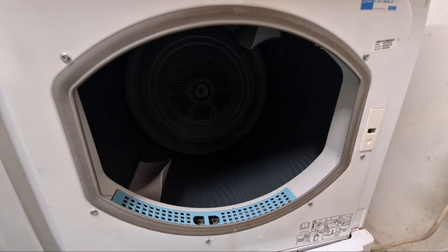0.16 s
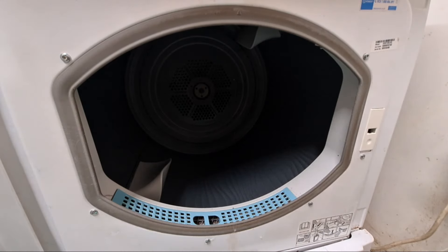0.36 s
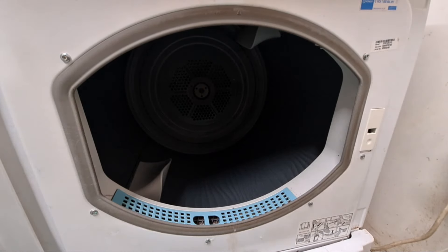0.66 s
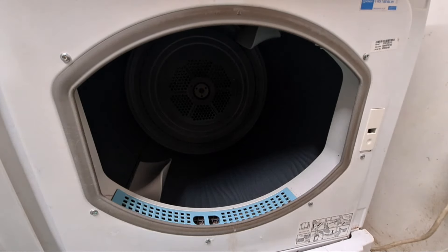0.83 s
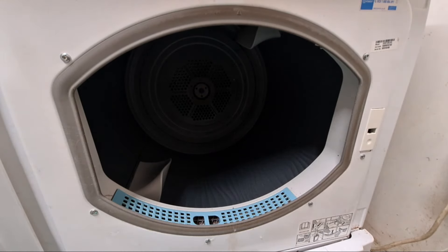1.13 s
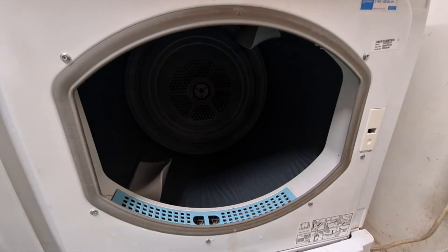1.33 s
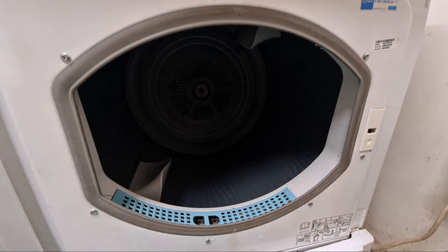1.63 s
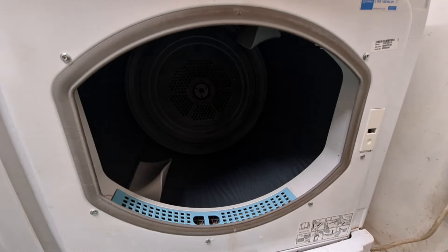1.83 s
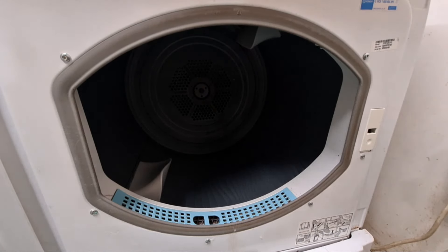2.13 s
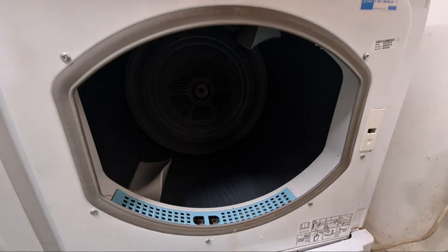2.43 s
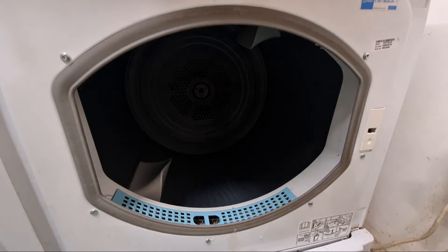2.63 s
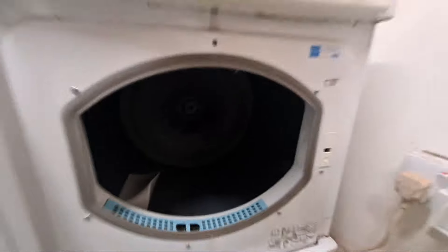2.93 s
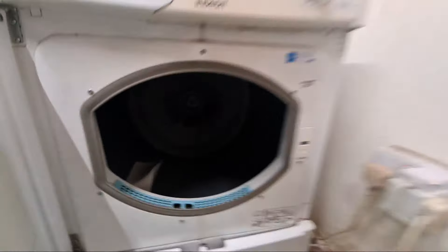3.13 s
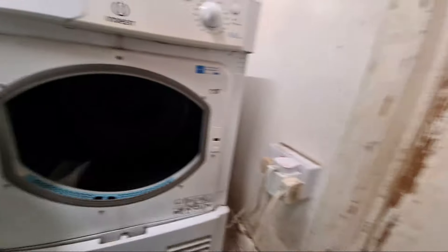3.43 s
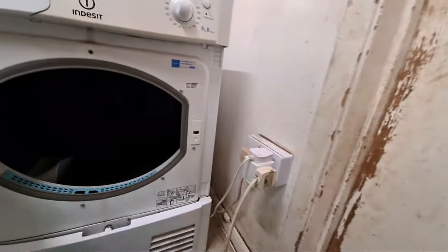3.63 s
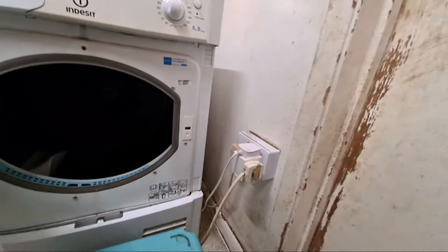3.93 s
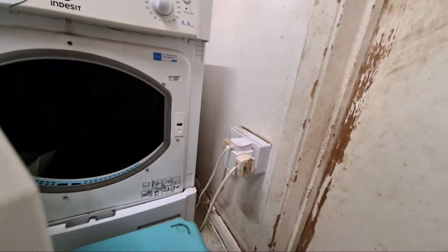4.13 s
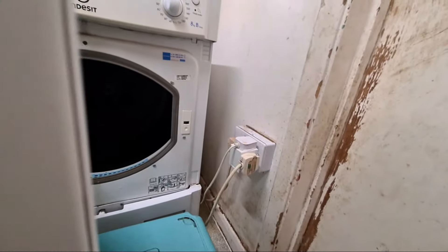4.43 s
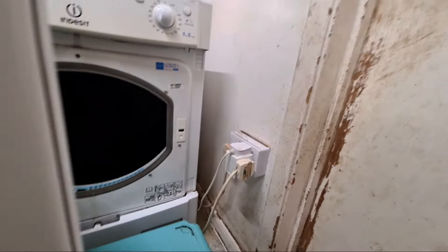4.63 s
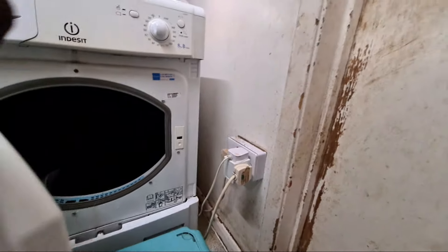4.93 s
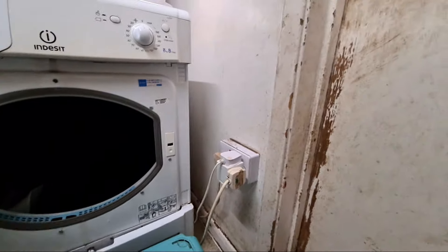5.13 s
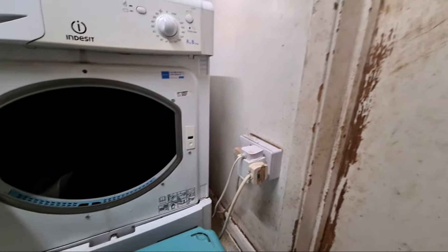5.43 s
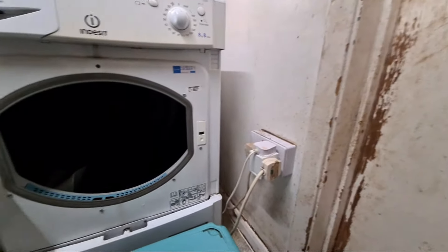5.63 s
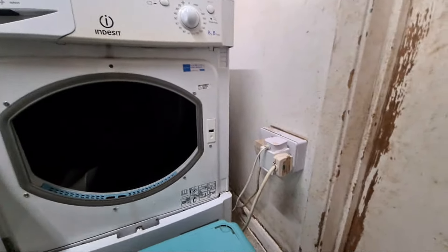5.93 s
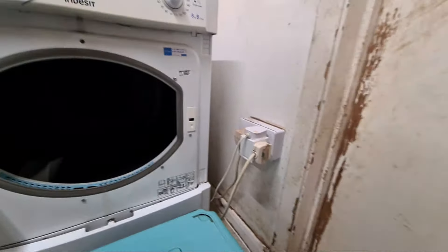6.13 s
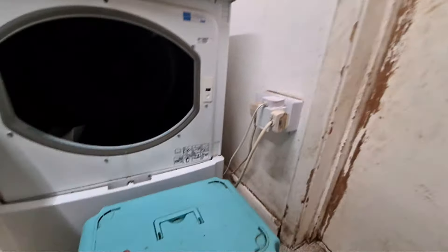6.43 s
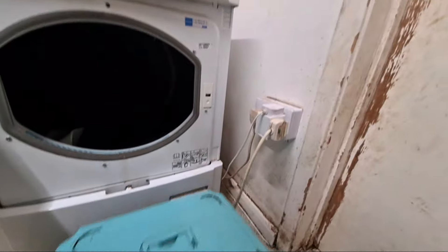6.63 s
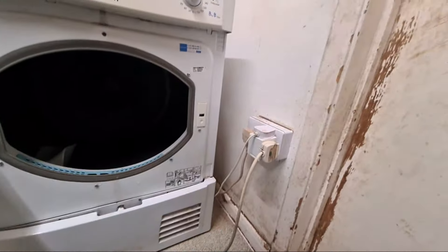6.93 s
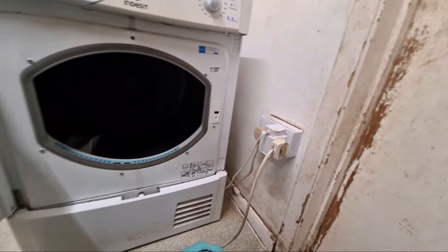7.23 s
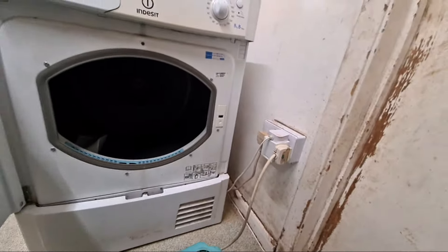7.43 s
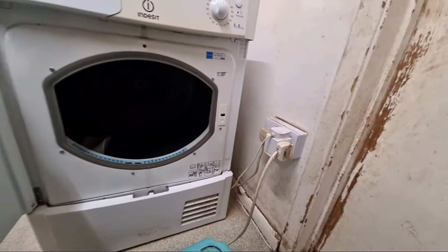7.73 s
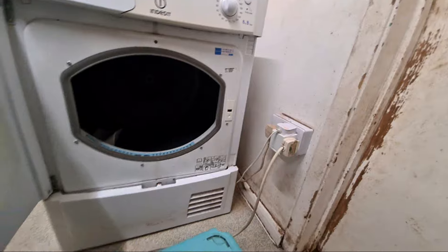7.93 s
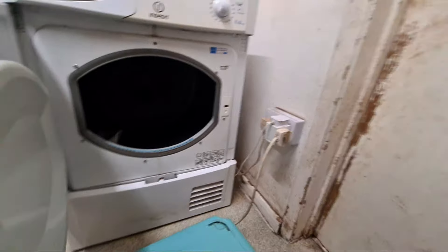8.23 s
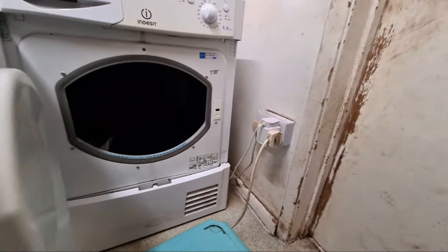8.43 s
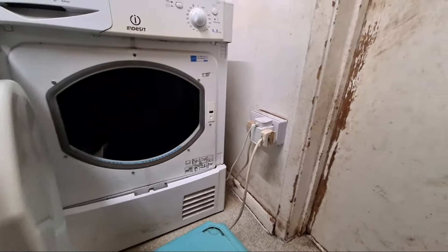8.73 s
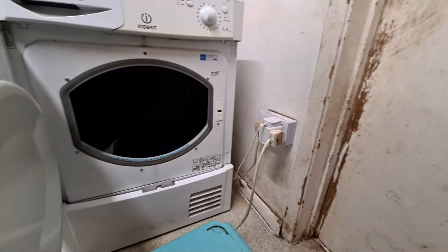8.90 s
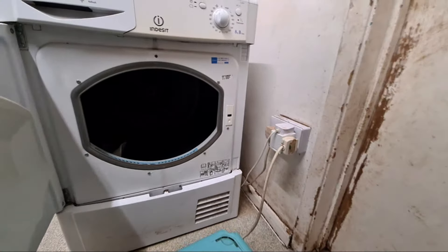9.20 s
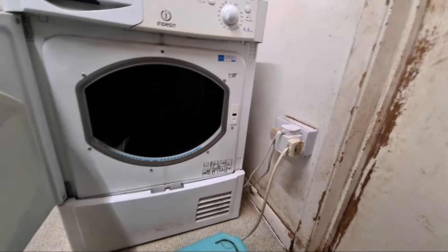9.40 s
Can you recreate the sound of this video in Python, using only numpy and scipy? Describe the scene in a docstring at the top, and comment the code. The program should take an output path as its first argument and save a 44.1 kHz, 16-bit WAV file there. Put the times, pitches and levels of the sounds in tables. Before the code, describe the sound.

Heavy hollow thumps and juddering plastic drags against a sheet-metal dryer cabinet, with small squeaks and clicks over a faint low hum.

```python
"""In a small, quiet room, a hollow plastic water container is handled at a tumble dryer.
Blows on the sheet-metal cabinet mix panel thumps, ringing body modes and wall clacks.
Two long, juddering drags along the runners and many short rubs are random jerks driving the same body.
Stick-slip squeaks, light clicks and fine hiss join in, over a low sine hum and faint steady noise."""
import sys
import numpy as np
from scipy import signal
from scipy.fft import rfft, irfft, next_fast_len
from scipy.io import wavfile
from scipy.ndimage import uniform_filter1d

SR = 44100
rng = np.random.default_rng(int(sys.argv[2]) if len(sys.argv) > 2 else 0)


def transcribe(u):
    """Save the signal u as a 16-bit wav file named by the first command-line argument.

    u: samples, shape (n,) or (channels, n), limited to [-1, 1]; the rate is SR.
    q: integer samples, one column per channel.
    """
    v = np.clip(np.atleast_2d(u).T, -1, 1)
    q = np.round(v * 32767).astype(np.int16)
    wavfile.write(sys.argv[1], SR, q)


N = 421596

# blows of the container: start_s, thump_hz, clack_hz, thump_db, hollow_body_db, wall_clack_db
KNOCKS = [(0.205, 105, 430, -42.5, -73, -80), (0.482, 132.4, 510, -21.5, -34, -43.5),
          (0.665, 133, 347, -39, -60, -74), (1.767, 146, 790, -21, -42, -47),
          (1.995, 123, 980, -23.5, -41.5, -56), (2.338, 123, 472, -43, -43, -68),
          (2.756, 96, 2034, -44, -42, -32.5), (2.84, 96, 287, -44, -41.5, -54),
          (3.256, 111, 517, -50, -36.5, -52.5), (3.301, 147, 1058, -19.5, -17.5, -28),
          (3.318, 90.5, 530, -14, -35, -39), (3.344, 85, 1010, -21, -35, -31.5),
          (3.438, 153, 1106, -23, -27, -34.5), (3.549, 126, 456, -16, -34, -45),
          (4.084, 152, 444, -24.5, -41, -42), (4.438, 194, 470, -45.5, -48, -54.5),
          (5.132, 177, 307, -10, -21, -32.5), (5.155, 147, 652, -21, -23.5, -33),
          (5.183, 102, 550, -18, -35, -36), (5.194, 100, 446, -16.5, -40, -61),
          (5.245, 117.6, 382, -21, -38, -74), (6.474, 109, 460, -41, -42, -39.5),
          (6.515, 164, 404, -27, -28, -31), (6.533, 182, 1820, -31, -48, -27.5),
          (6.561, 167, 270, -11, -18.5, -36), (6.622, 169, 1341, -19.5, -31, -45),
          (6.667, 100, 1408, -28, -43, -34), (6.744, 173.5, 1370, -17.5, -37, -44),
          (6.896, 159.5, 1314, -12.5, -32, -32.5), (6.992, 163, 1240, -21.5, -31, -47),
          (7.392, 159, 438, -30.5, -39.5, -62), (7.711, 112, 276, -33.5, -57, -48.5),
          (7.845, 120, 486, -30.5, -51, -71), (8.063, 121, 367, -39, -18.5, -33),
          (8.077, 122, 994, -20, -23.5, -30.5), (8.222, 122, 562, -42.5, -38.5, -52),
          (8.481, 126, 930, -39, -40.5, -48.5), (8.566, 177, 2052, -25, -27.5, -35.5),
          (8.669, 103, 286, -21, -38.5, -51.5), (8.753, 115, 686, -53, -39.5, -58),
          (8.858, 146, 556, -56, -40, -65), (8.919, 172, 780, -28.5, -33.5, -50),
          (9.392, 213, 1710, -27.5, -37, -36.5), (9.473, 145, 632, -19, -29.5, -49),
          (9.511, 152, 774, -17.5, -28.5, -50)]
# cabinet and container ringing together: pitch_hz, level_db, t60_s
BODY_MODES = [(80.6, -9.5, 0.98), (103.2, -9, 0.93), (144.6, 2.5, 0.41), (167.8, -4, 0.42),
              (205.1, -14, 0.24), (211.3, -5.5, 0.65), (285.2, -4.5, .25), (312.4, -7.5, .4),
              (341, -7.5, 0.42), (399.7, -0.5, 0.15), (438.6, -1.5, 0.31), (511, -2, 0.19),
              (642.7, -9, 0.23), (650, -13, 0.57), (741, -23, 0.071), (937, -16.5, 0.18),
              (1017, -11.5, 0.74), (1070, -14, 0.13), (1202, -7, 0.17), (1300, -9, 0.075), (1309, -1, 0.11),
              (1580, -20, 0.2), (1894, -13, 0.41), (2270, -21.5, 0.13), (3450, -30.5, 0.45),
              (3620, -24, 0.15), (4595, -27.5, .12)]
# colour of the crowd of higher wall modes: frequency_hz, density_db (per Hz)
WALL_COLOUR = [(45, -34.5), (70, 8), (120, 7), (170, 3.5), (250, -6), (320, -6.5), (500, -5), (800, -11),
               (1250, -6.5), (3000, -22.5), (4800, -22), (7300, -37), (9000, -28.5), (16000, -35)]
# four bands from judder over hollow body and wall rasp to hiss: low_hz, high_hz
REGISTERS_HZ = [(62, 250), (250, 800), (800, 3000), (3000, 17000)]
# effort of the pull, one curve for each long drag: time_s, pull_db
DRAGS = [
    [(3.47, -41), (3.634, -30), (3.682, -24.5), (3.688, -25.5), (3.848, -25), (3.948, -39), (4.194, -41.5),
     (4.266, -50.5), (4.34, -74)],
    [(6.52, -41), (6.532, -36.5), (6.636, -39.5), (6.78, -33), (6.828, -38), (6.888, -30.5), (7.07, -50),
     (7.104, -57), (7.18, -79)],
]
# answer of each register to the pull: level_db (at the reference pull), follow_db (per dB of pull)
DRAG_RESPONSE = [(-20, 0.9), (-24.5, 1.09), (-30, 1.0), (-44.5, 0.66)]
# how heavily the container bears down, one value for each drag: judder_db
DRAG_JUDDER_DB = [0, -5.5]
# short rubs of plastic on plastic: start_s, length_s, level_db, extra_judder_db, brightness_db
RUBS = [(0.803, 0.075, -67, 10, 11.5), (1.177, 0.1, -67.5, 5.5, 0), (1.447, 0.44, -68.5, 15, 2),
        (2.325, 0.12, -53, 2.5, -2.5), (2.609, 0.13, -51.5, -3.5, 5.5), (2.838, 0.13, -50, 3, -3),
        (2.978, 0.063, -46, 1, 1.5), (3.103, 0.086, -47.5, 1.5, -0.5), (4.508, 0.22, -66, 3.5, 8),
        (4.918, 0.065, -53, 4, 3.5), (5.338, 0.054, -52, 12.5, 9), (5.442, 0.11, -65, 16.5, -1.5),
        (5.647, 0.057, -57.5, -1.5, 3), (6.297, 0.12, -54.5, 5, 21), (6.354, 0.046, -47, -10, 12.5),
        (6.464, 0.045, -47, 9.5, 5), (7.07, 0.021, -39, -19, 6), (7.145, 0.15, -52.5, -0.5, 7),
        (7.7, 0.12, -43.5, 8, 5), (7.83, 0.093, -54.5, 11, -8), (7.958, 0.15, -45.5, -4, 1),
        (8.072, 0.079, -39.5, -8, 12), (8.215, 0.02, -58, -5, -12), (8.308, 0.29, -62.5, -12, -4),
        (8.565, 0.068, -50.5, 4, 2), (8.584, 0.089, -59.5, 22.5, -2), (8.876, 0.041, -45, 4, -5),
        (9.009, 0.041, -51.5, 1, 0.5), (9.096, 0.042, -60.5, 12, 9.5), (9.358, 0.144, -42, 0.5, 11.5)]
# squeaks and groans of even stick-slip: start_s, length_s, pitch_hz, level_db
SQUEAKS = [(0.074, .2, 1350, -71.5), (0.075, 0.22, 2030, -76), (1.451, 0.069, 920, -66),
           (1.53, 0.19, 714, -63), (2.614, 0.16, 1020, -50), (2.743, 0.032, 1250, -36),
           (3.66, 0.1, 169, -7.5), (3.72, 0.06, 212.3, -13.5), (3.728, 0.07, 313.7, -18),
           (3.809, 0.068, 1110, -29), (3.85, .11, 147.8, -16), (4.041, 0.063, 304, -32.5),
           (6.369, 0.061, 411, -38.5), (6.522, 0.015, 1920, -27), (6.865, 0.042, 910, -31),
           (6.882, 0.021, 2050, -31.5), (8.48, 0.092, 944, -49)]
# light clicks, some alone, some the sharp treble onset of a blow: start_s, level_db, tilt_db (per octave)
CLICKS = [(2.802, -51, 3), (4.970, -55.5, -8.5), (5.127, -39, -6.5), (5.271, -44, -0.5), (6.014, -65, 3),
          (6.473, -37.5, -7), (6.517, -32.5, -2.5), (6.534, -42, 2), (6.887, -36, 5), (7.252, -35.5, 1),
          (7.712, -53.5, 2), (7.749, -45, 1), (7.893, -40.5, 1.5), (8.064, -24.5, -4.5), (8.083, -37.5, -8),
          (8.568, -35, -24), (8.671, -57.5, -4), (8.829, -50, 1), (9.122, -51, 3), (9.395, -41.5, -1)]
# colour of a click before its tilt: frequency_hz, density_db (per Hz)
CLICK_COLOUR = [(1500, -4.5), (3300, -4), (5200, 1), (7300, -4.5), (9000, 1), (12000, -1.5), (16000, -9)]
# fine treble hiss during handling and along the second drag: start_s, length_s, level_db
HISSES = [(2.3, 0.79, -70), (4.613, 0.12, -70.5), (5.52, 0.17, -73.5), (6.03, .11, -68.5),
          (6.273, 0.081, -59.5), (6.52, 0.4, -55.5), (7.004, 0.41, -66.5)]
# swell of the hum: time_s, level_db
HUM_LEVEL = [(0, -47.5), (2.3, -47), (4.2, -39), (4.5, -66.5), (5.05, -48), (5.9, -51), (7.5, -49),
             (9.56, -51.5)]
# colour of the steady background noise, with a little more hiss above 8 kHz: frequency_hz, density_db (per Hz)
STEADY_COLOUR = [(20, -34), (40, -16), (55, 3), (75, 0.5), (110, 3), (170, -17), (300, -17), (420, -29.5),
                 (1000, -36.5), (3000, -45), (7300, -49.5), (8600, -41.5), (12000, -43), (16000, -51.5)]

CONTACT_S = 0.0047  # build-up of a blow, to within 60 dB of its full force
TICK_DB = -14  # edge ticks against the wall clack
REFERENCE_PULL_DB, DRAG_FADE_S = -27, 0.016
RASP_DB, HISS_DB = -16, -25.5  # a rub's upper registers against its hollow body
HISS_FOLLOWS = 0.86  # dB of hiss per dB of brightness
ATTACK_S, RELEASE_DB_PER_S = 0.031, 173.5  # shared by rubs and fine hisses
FIRM_DB, LIGHT_DB = -30, -65  # squeak levels of a firm and a light touch
WANDER_FIRM, WANDER_LIGHT = 0.035, 0.115  # rms pitch wander, fraction of the pitch
HUM_HZ, STEADY_DB = 66.5, -54
CUTOFF_HZ = 15900


def from_db(db):
    """Decibels to gain."""
    return 10 ** (np.asarray(db) / 20)


def rms_one(x):
    """Scale to unit power."""
    return x / np.sqrt(np.mean(x ** 2) + 1e-20)


def peak_one(x, size=220):
    """Scale so that the loudest few milliseconds have unit power."""
    return x / np.sqrt(uniform_filter1d(x ** 2, size).max() + 1e-20)


def in_time(rows):
    """Each column of a curve at every sample."""
    s, *columns = np.transpose(rows)
    return [np.interp(np.arange(N) / SR, s, column) for column in columns]


def band(x, edges):
    """Causal band-pass."""
    return signal.sosfilt(signal.butter(4, edges, "band", fs=SR, output="sos"), x)


def noise(colour, n):
    """Noise of a given colour and unit power."""
    hz, db = np.transpose(colour)
    size = next_fast_len(n)
    grid = np.maximum(np.fft.rfftfreq(size, 1 / SR), 1)
    shape = from_db(np.interp(np.log(grid), np.log(hz), db))
    white = rfft(rng.standard_normal(size))
    return rms_one(irfft(white * shape, size)[:n])


def dying(t, t60):
    """Exponential decay, 60 dB down after t60 seconds."""
    return np.exp(-np.log(1000) * t / t60)


def add(out, s, sound):
    """Mix a sound in at a time."""
    at = max(int(s * SR), 0)
    out[at:at + len(sound)] += sound[:max(N - at, 0)]


def ring_time(size=24576):
    """The time axis of one short sound, in seconds."""
    return np.arange(size) / SR


def stroke(s, length_s):
    """The gain of one light stroke: a linear attack, then a release from length_s after its start."""
    t = np.maximum(np.arange(N) / SR - s, 0)
    attack = np.minimum(t / ATTACK_S, 1)
    return attack * from_db(-RELEASE_DB_PER_S * np.clip(t - length_s, 0, 1))


def knocks():
    """A blow's thump, hollow body and clack have their own levels; the edge tick follows the clack."""
    out, t = np.zeros(N), ring_time()
    rings = mode_rings(t)
    for s, thump_hz, clack_hz, thump_db, body_db, clack_db in KNOCKS:
        walls = peak_one(wall_ring(t, crack_db=2, ring_t60=0.076, room_db=1.0, room_t60=0.33))
        body = from_db(-11.5) * peak_one(body_modes(rings))
        patch = from_db(-7) * peak_one(clack(t, clack_hz, cycles=170))
        # plastic gives way before it bears the load
        struck = (walls + body + patch) * (1 - dying(t, CONTACT_S))
        parts = [peak_one(band(struck, edges)) for edges in REGISTERS_HZ]
        panel = peak_one(thump(t, thump_hz, swell_s=0.0054, t60=0.09))
        parts[0] = peak_one(from_db(-3.5) * parts[0] + panel)
        levels_db = [thump_db, body_db, clack_db, clack_db + TICK_DB]
        add(out, s, from_db(levels_db) @ np.array(parts))
    return out


def thump(t, hz, swell_s, t60):
    """A broad panel takes a few milliseconds to swing up, and is soon damped."""
    return np.sin(2 * np.pi * hz * t) * (1 - np.exp(-t / swell_s)) * dying(t, t60)


def clack(t, hz, cycles, count=10):
    """The struck patch of wall rings in a cluster of close modes; the highest patches die soonest."""
    pitches = hz * (1 + 0.07 * rng.standard_normal((count, 1)))
    strengths = rng.standard_normal((count, 1))
    cluster = np.sum(strengths * np.sin(2 * np.pi * pitches * t), axis=0)
    return cluster * dying(t, min(cycles / hz, 0.09))


def mode_rings(t):
    """The free ring of each body mode, a decaying sine."""
    return np.array([from_db(db) * np.sin(2 * np.pi * hz * t) * dying(t, t60)
                     for hz, db, t60 in BODY_MODES])


def body_modes(rings):
    """Every point of contact excites the modes with other strengths and signs."""
    signs = rng.choice([-1, 1], len(rings))
    return (signs * from_db(rng.normal(0, 3.4, len(rings)))) @ rings


def wall_ring(t, crack_db, ring_t60, room_db, room_t60):
    """Dense plastic modes: a crack, a short ring, and the room's tail, which takes a moment to fill."""
    crack = from_db(crack_db) * dying(t, 0.013)
    room = from_db(room_db) * dying(t, room_t60) * (1 - dying(t, 0.041))
    return noise(WALL_COLOUR, len(t)) * (crack + dying(t, ring_t60) + room)


def sliding():
    """Stick-slip jerks drive the same body and room; their force follows the drags and rubs."""
    out, rubbed = np.zeros(N), rubbing(slips(per_s=550, spread_db=3.5))
    for edges, power in zip(REGISTERS_HZ, drag_power() + rub_power()):
        part = band(rubbed, edges)
        strength = np.sqrt(np.abs(uniform_filter1d(part ** 2, size=2600)) + 1e-12)
        # the slow level is the pull's, the fast grain the jerks'
        out += np.sqrt(power) * part / strength
    return out


def slips(per_s, spread_db):
    """Stick and slip: small jerks of uneven size and either sign at random moments."""
    sizes = from_db(spread_db * np.minimum(rng.exponential(1, N), 4))
    signs = rng.choice([-1, 1], N)
    return sizes * signs * (rng.random(N) < per_s / SR)


def rubbing(jerks, size=4410):
    """The contact travels along the wall, so each stretch of the way rings a little differently."""
    t, out = ring_time(size=16384), np.zeros(N)
    rings = mode_rings(t)
    for at in range(0, N, size):
        walls = rms_one(wall_ring(t, crack_db=3, ring_t60=0.08, room_db=-9, room_t60=0.4))
        body = from_db(-3.5) * rms_one(body_modes(rings))
        add(out, at / SR, signal.fftconvolve(jerks[at:at + size], walls + body))
    return out


def drag_power():
    """Power in each register during the long drags: a harder pull raises the lows faster than the hiss."""
    power, t = np.zeros((4, N)), np.arange(N) / SR
    for drag, judder_db in zip(DRAGS, DRAG_JUDDER_DB):
        pull_db, = in_time(drag)
        to_nearest_end = np.minimum(t - drag[0][0], drag[-1][0] - t)
        moving = np.clip(1 + to_nearest_end / DRAG_FADE_S, 0, 1)
        gains = np.array([from_db(db + follows * (pull_db - REFERENCE_PULL_DB))
                          for db, follows in DRAG_RESPONSE])
        gains[0] *= from_db(judder_db)
        power += (moving * gains) ** 2
    return power


def rub_power():
    """Power in each register during the short rubs: weight brings judder, an edge brings rasp and hiss."""
    gains = [from_db([db + judder_db, db, db + RASP_DB + bright_db,
                      db + HISS_DB + HISS_FOLLOWS * bright_db])
             for _, _, db, judder_db, bright_db in RUBS]
    strokes = np.array([stroke(s, length_s) ** 2 for s, length_s, *_ in RUBS])
    return np.transpose(gains) ** 2 @ strokes


def squeaks():
    """A rough, nearly periodic slip swells and stops; the wall rings on briefly."""
    out, t = np.zeros(N), ring_time()
    slow = [(1, 0), (120, 0), (500, -30), (2000, -90)]
    for s, length_s, hz, db in SQUEAKS:
        wobble, bite = [noise(slow, len(t)) for _ in range(2)]
        # a lighter touch holds its pitch less steadily
        wander = np.interp(db, [LIGHT_DB, FIRM_DB], [WANDER_LIGHT, WANDER_FIRM])
        phase = 2 * np.pi * np.cumsum(hz * (1 + wander * wobble)) / SR
        grip = np.sin(np.pi * np.minimum(t / length_s, 1)) * from_db(4.9 * bite)
        swell = signal.fftconvolve(grip, dying(t, 0.0307))[:len(t)]
        add(out, s, from_db(db) * peak_one(swell * np.sin(phase)))
    return out


def clicks():
    """Tilted noise, thin or dull, in three decays: a sharp crack, a short ring and the room's tail."""
    out, t = np.zeros(N), ring_time()
    for s, db, tilt in CLICKS:
        colour = [(hz, level + tilt * np.log2(hz / CLICK_COLOUR[0][0])) for hz, level in CLICK_COLOUR]
        crack = from_db(-8.5) * dying(t, 0.008)
        room = from_db(-9) * dying(t, 0.41)
        click = noise(colour, len(t)) * (crack + dying(t, 0.11) + room)
        add(out, s, from_db(db) * peak_one(click))
    return out


def fine_hiss():
    """Fine treble hiss during handling and along the second drag: coloured noise in soft strokes."""
    gain = sum(from_db(db) * stroke(s, length_s) for s, length_s, db in HISSES)
    colour = [(1000, -24), (5000, -13.5), (7500, -12.5), (8500, -5), (12000, -5), (16000, -11)]
    return gain * noise(colour, N)


def background():
    """A low sine hum, slightly wavering in phase, over faint steady noise."""
    hum_db, = in_time(HUM_LEVEL)
    waver = noise([(1, 0), (6, -6), (30, -50), (200, -120)], N)
    phase = 2 * np.pi * HUM_HZ * np.arange(N) / SR + 0.22 * waver
    hum = np.sqrt(2) * np.sin(phase)  # unit power
    return from_db(hum_db) * hum + from_db(STEADY_DB) * noise(STEADY_COLOUR, N)


def scene():
    """Everything at one microphone."""
    return (knocks() + sliding() + squeaks() + clicks() + fine_hiss() + background())[None]


def record(dry):
    """The small microphone loses the deepest bass; the top is cut steeply."""
    thin = signal.sosfilt(signal.butter(4, 48, "high", fs=SR, output="sos"), dry)
    return signal.sosfilt(signal.ellip(12, 0.2, 80, CUTOFF_HZ, fs=SR, output="sos"), thin)


dry = scene()
out = record(dry)
transcribe(out)
```